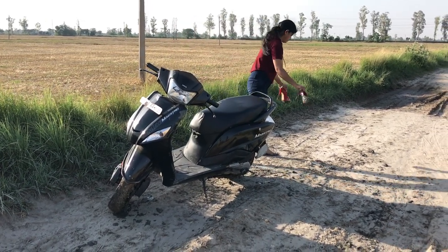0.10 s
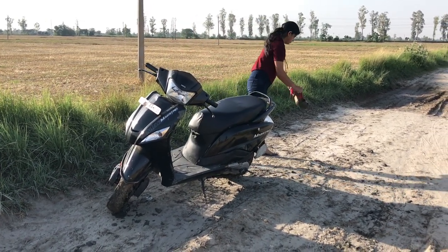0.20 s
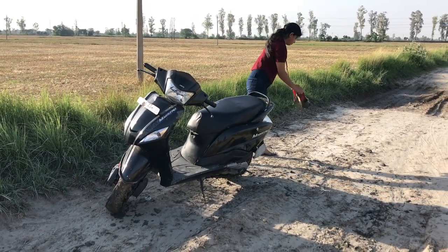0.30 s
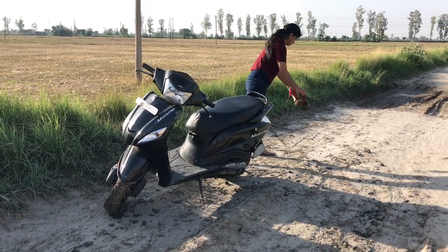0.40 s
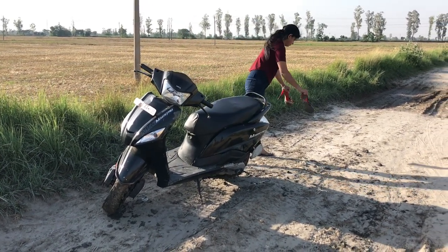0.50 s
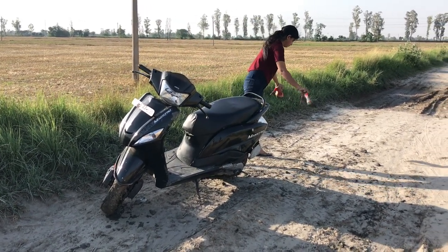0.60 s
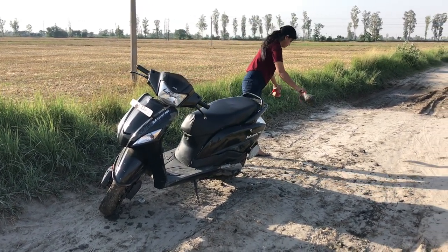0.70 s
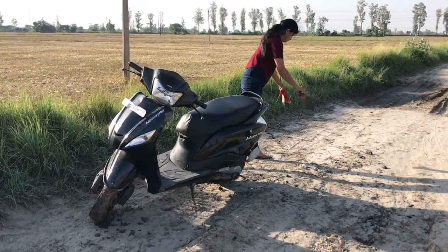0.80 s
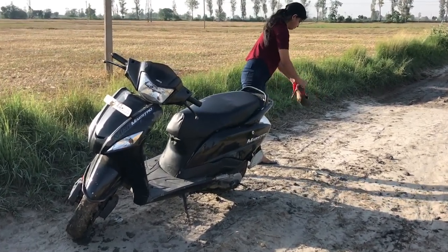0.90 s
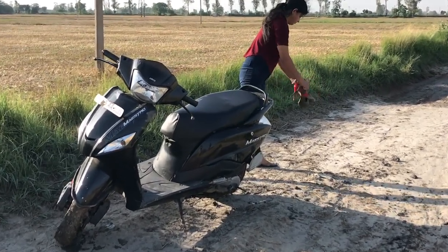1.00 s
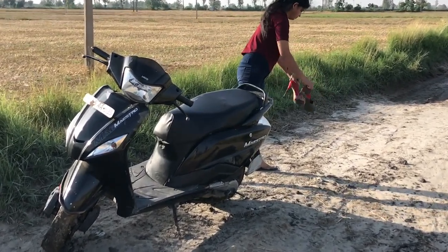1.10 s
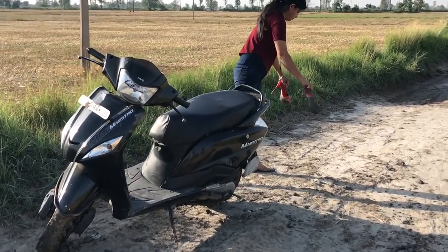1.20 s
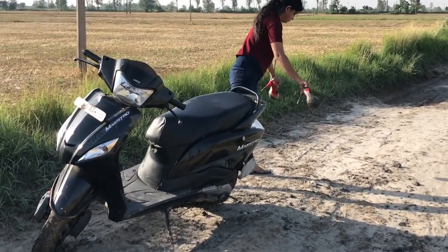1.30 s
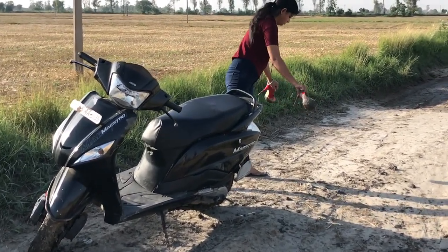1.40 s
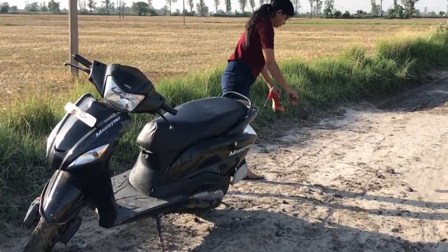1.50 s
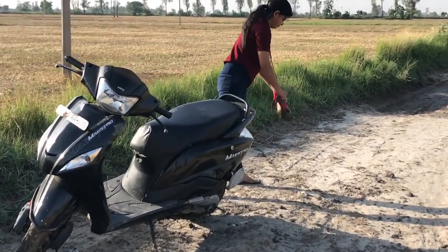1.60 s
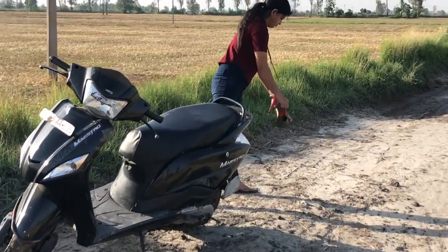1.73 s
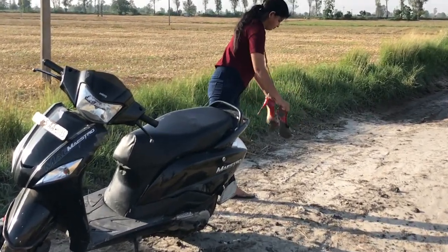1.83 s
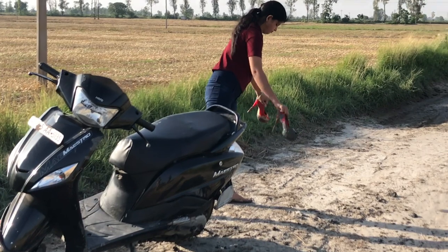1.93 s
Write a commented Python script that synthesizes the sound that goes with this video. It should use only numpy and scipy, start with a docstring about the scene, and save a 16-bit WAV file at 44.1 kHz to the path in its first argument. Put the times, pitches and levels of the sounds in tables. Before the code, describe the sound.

Sharp claps of mud-caked sandals, sole against sole, in an open field with low rumble and faint insects.

```python
"""Soft bumps on the microphone over a low rumble, then three claps of two muddy sandals in an open field.
Each clap, sole to sole, squeezes out a pop of air, rings the rubber and cracks the dried mud.
The soles rebound, and crumbs and dust tick down; the ground answers with a faint tail and a dull echo.
A faint high trill of falling chirps comes from the grass, with a thin unbroken insect further off.
Pops, rings and thuds are sines under envelopes; mud, dust, rumble and air are coloured noise."""
import sys
import numpy as np
from scipy import signal
from scipy.fft import rfft, irfft
from scipy.io import wavfile

SR = 44100
rng = np.random.default_rng(int(sys.argv[2]) if len(sys.argv) > 2 else 0)


def int16_out(signal):
    """Quantize to a 16-bit WAV file."""
    q = np.round(np.clip(np.atleast_2d(signal).T, -1, 1) * 32767)
    wavfile.write(sys.argv[1], SR, q.astype(np.int16))


N = 85995
T = np.arange(N) / SR   # s

# Colours of noise are relative: every noise is brought to rms 1 before its level is set.
# Deep rumble under the field. Each row: frequency in Hz, level in dB per Hz.
RUMBLE_COLOUR = [(15, -24), (30, -8.5), (50, 8.5), (72, 3), (110, 1.5), (140, -3.5), (220, -43.5)]
# Low drone above the rumble. Each row: frequency in Hz, level in dB per Hz.
DRONE_COLOUR = [(70, -10), (115, -2.5), (160, 0.5), (235, -2), (270, -9.5), (330, -9.5), (450, -22.5),
                (900, -40.5)]
# How rumble and drone rise and sink. Each row: time in seconds, rumble in dB, drone in dB.
LOW_LEVELS = [(0, -33, -42.5), (.08, -41, -44), (.2, -34.5, -41.5), (.4, -38, -44.5), (.56, -36.5, -45),
              (.74, -36.5, -43.5), (.98, -39, -40.5), (1.1, -39.5, -42), (1.3, -40.5, -45.5),
              (1.43, -39.5, -40.5), (1.55, -40, -43), (1.72, -37.5, -43.5), (1.95, -44, -41)]
LOW_SWAY_DB = 0.9   # random spread shared by rumble and drone
# Hush of open country. Each row: frequency in Hz, level in dB per Hz.
AIR_COLOUR = [(100, -31.5), (450, 2.5), (700, 5), (1150, 4), (1600, 0), (2300, -8), (4000, -14),
              (6000, -20), (8500, -16.5), (10300, -27.5), (12500, -8), (15000, -17.5), (16500, -11)]
# Level of that hush. Each row: time in seconds, level in dB.
AIR_LEVELS = [(0, -48.5), (.3, -50.5), (.5, -48), (.8, -50), (1.1, -49.5), (1.4, -48.5), (1.95, -49)]

# Trill in the grass. Each row: time in seconds, mid-chirp pitch in Hz, level in dB.
TRILL_CURVE = [(0, 8200, -54.5), (.26, 8200, -56), (.32, 8100, -78), (0.579, 7720, -80), (.68, 7800, -63),
               (.9, 7830, -54), (1.049, 7720, -54), (1.24, 7700, -56.5), (1.28, 7900, -82)]
# Pace of the trill. Each row: time in seconds, chirps per second, fall within a chirp in Hz.
CHIRP_PACE = [(0, 53, 1150), (.9, 53, 1400), (1.05, 88, 1900), (1.25, 92, 1900)]
# The insect further off. Each row: time in seconds, pitch in Hz, level in dB.
FAR_INSECT_CURVE = [(0, 8350, -79), (1.199, 8400, -65), (1.6, 8650, -71), (1.95, 8650, -61)]
CHIRP_WAVER_HZ, FAR_WAVER_HZ, FAR_FLUTTER_DB = 60, 176, 5   # random spreads

# Dull bumps on the microphone.
# Each row: start in seconds, level in dB, start pitch in Hz, end pitch in Hz, swell in seconds.
MIC_BUMPS = [(0.148, -29.5, 145, 88, 0.0095), (0.2406, -9.5, 231.5, 130, 0.0071),
             (0.2395, -22, 428, 270, 0.0029), (0.256, -11, 94, 60.6, 0.0054), (0.286, -21, 69, 56.5, 0.013),
             (0.351, -16.5, 80, 45, 0.0078), (0.423, -29, 61, 45, 0.012), (0.515, -32, 296, 89.4, 0.0074),
             (0.809, -21, 152, 45, 0.0037), (0.818, -24.5, 69, 49.7, 0.0074),
             (0.9075, -22.5, 125, 35, 0.0065)]
# Rubbing within a bump. Each row: frequency in Hz, level in dB per Hz.
SCUFF_COLOUR = [(60, 9), (200, 0.5), (450, -11.5), (700, -16), (1200, -51)]
BUMP_SHAPE, BUMP_GLIDE_S, BUMP_SCUFF_DB = 1.52, 0.017, -17   # scuff level is relative to the thud

# Dust sifting down through the grass after the contacts whose air pop exceeds DUST_FROM_DB.
DUST_FROM_DB, DUST_DELAY_S, DUST_FALL_S = -10, 0.042, 0.082   # the fall is thickest DUST_FALL_S after the delay
DUST_PER_S = 47   # ticks per second at the thickest of one fall
DUST_DB, DUST_T60_S = -51, 0.0031   # level of the faintest tick, decay of each

# Crumbs of mud landing. Each row: start in seconds, level in dB, fine part relative to the coarse in dB.
CRUMB_LANDINGS = [(0.316, -57, 21), (0.4046, -54, 5), (0.5762, -44.5, -8), (0.6013, -61, 13),
                  (0.6552, -46, 8), (0.9960, -47, 11.5), (1.0010, -51.5, 14.5), (1.008, -46, 0),
                  (1.0237, -56.5, 15), (1.556, -66.5, 17.5), (1.7052, -51.5, 21), (1.7115, -55.5, 18)]
# Fine part of a crumb, also used for dust. Each row: frequency in Hz, level in dB per Hz.
FINE_CRUMB_COLOUR = [(1000, -3.5), (4000, -30.5), (7000, -5.5), (10000, -7.5), (12500, -0.5),
                     (16000, -10.5)]
CRUMB_HOLD_S, CRUMB_T60_S = 0.00064, 0.018   # grainy body
CRUMB_SNAP_DB, CRUMB_SNAP_T60_S = 4.5, 0.0018   # first touch, relative to the body

# Sole contacts, claps and rebounds. Each row: start in seconds, air pop in dB, pop pitch in Hz,
# pop swell in seconds, sole ring in dB, hardness in dB per octave, highest ringing in Hz,
# mud crack in dB, gritty crunch in dB, clack in dB, clack pitch in Hz.
SOLE_CONTACTS = [(0.2797, 2, 1001, 0.0012, -27.5, 4.5, 3540, -18.5, -33, -22, 3016),
                 (0.2824, -4.5, 980, 0.00129, -34, -6, 3370, -37.5, -44, -11, 686),
                 (0.3023, -17, 1160, 0.0019, -32.5, -0.5, 3400, -50, -22, -20.5, 2693),
                 (0.3276, -30, 1230, 0.0019, -33, -1, 2980, -32.5, -47, -28.5, 2700),
                 (0.9588, -6, 1019, 0.0027, -11.5, -1, 5300, -15.5, -19.5, -16.5, 4175),
                 (1.6637, 0, 970, 0.0022, -13.5, -3, 3310, -17.5, -17, -16.5, 1400),
                 (1.6814, -16.5, 1050, 0.0022, -27, -3.5, 3600, -25.5, -25, -38, 2840)]
# Ringing modes of the rubber sole. Each row: frequency in Hz, level in dB, 60 dB decay in seconds.
SOLE_MODES = [(372, -8, 0.043), (694, -9, 0.034), (1375, 16, 0.0048), (1570, -14, 0.05), (1822, 6, 0.02),
              (2645, -5.5, 0.015), (2920, 2.5, 0.015), (4020, 4, 0.011), (4610, -20, 0.0053)]
# Breaking mud, fine. Each row: frequency in Hz, level in dB per Hz.
CRACK_COLOUR = [(300, -54), (1000, 25.5), (3000, -4), (5000, 1.5), (8500, 2.5), (10300, -2), (12300, 3),
                (14500, -4), (16500, -6)]
# Breaking mud, coarse. Each row: frequency in Hz, level in dB per Hz.
CRUNCH_COLOUR = [(500, -7), (1500, -9.5), (2300, 0), (2800, -7), (3500, 1), (4300, -2.5), (5000, -16),
                 (8000, -32), (16000, -42)]
POP_SHAPE, POP_SAG = 4.9, 0.069   # sag: fall in log pitch per swell time
CONTACT_S = 0.00056   # time constant of the closing soles
BODY_HZ, BODY_DB, BODY_T60_S = 165, -20, 0.12   # the whole sandal flexes; level relative to the sole ring
CLACK_SWELL_S = 0.0012
CRACK_HOLD_S, CRACK_T60_S, CRACK_GRAIN_DB = 0.0023, 0.012, 1.5
CRACK_SNAP_DB, CRACK_SNAP_T60_S = -1.5, 0.029   # relative to the crack
CRUNCH_HOLD_S, CRUNCH_T60_S = 0.0019, 0.014

# Scatter from grass and rough ground. Each row: frequency in Hz, level in dB per Hz.
SCATTER_COLOUR = [(200, -5), (500, 5), (1200, 5.5), (2200, -4), (3200, -3), (5000, -12), (10000, -15),
                  (13000, -12), (16000, -6)]
SCATTER_DB, SCATTER_T60_S = -18, 0.089
ECHO_DB, ECHO_S, ECHO_T60_S = -27.5, 0.049, 0.07   # level, delay and decay
CUTOFF_HZ = 15900   # top of the microphone channel


def from_db(db):
    """Decibels to gain."""
    return 10 ** (np.asarray(db) / 20)


def in_time(rows):
    """The columns of a curve, joined by straight lines."""
    s, *columns = np.transpose(rows)
    return [np.interp(T, s, column) for column in columns]


def noise(colour):
    """Noise of rms 1 with the given colour."""
    hz, db = np.transpose(colour)
    f = np.maximum(np.fft.rfftfreq(N, 1 / SR), 1)
    gain = from_db(np.interp(np.log(f), np.log(hz), db))
    x = irfft(rfft(rng.standard_normal(N)) * gain, N)
    return x / x.std()


def drift(rate):
    """Random wander of spread about 1, with `rate` new points per second."""
    return np.interp(T * rate, np.arange(4000), rng.standard_normal(4000))


def burst(start, hold, t60):
    """Envelope: sudden onset, short hold, exponential decay."""
    return (T >= start) * from_db(-60 * np.maximum(T - start - hold, 0) / t60)


def swell(age, peak_s, shape):
    """Envelope that rises to 1 at peak_s and dies away; a higher shape makes it narrower."""
    u = age / peak_s
    return (u * np.exp(1 - u)) ** shape


def sine(hz, age):
    """Sine on a pitch curve, starting when age turns positive."""
    return np.sin(2 * np.pi * np.cumsum(hz * (age > 0)) / SR)


def background():
    """Deep rumble, a low drone and the hush of open country, all coloured noise that rises and sinks."""
    rumble_db, drone_db = in_time(LOW_LEVELS)
    air_db, = in_time(AIR_LEVELS)
    low = from_db(rumble_db) * noise(RUMBLE_COLOUR) + from_db(drone_db) * noise(DRONE_COLOUR)
    sway = from_db(LOW_SWAY_DB * drift(15))
    return sway * low + from_db(air_db) * noise(AIR_COLOUR)


def far_insect():
    """A thin unbroken tone further off, wavering in pitch and fluttering in level."""
    hz, db = in_time(FAR_INSECT_CURVE)
    level = from_db(db + FAR_FLUTTER_DB * drift(100))
    return level * sine(hz + FAR_WAVER_HZ * drift(1300), T)


def grass_trill():
    """Quick chirps, each a swelling sine that falls in pitch, speeding up into a buzz."""
    hz, db = in_time(TRILL_CURVE)
    rate, fall_hz = in_time(CHIRP_PACE)
    cycle = (np.cumsum(rate) / SR + 0.054 * drift(17)) % 1   # place within a chirp, slightly uneven
    pitch = hz - fall_hz * (cycle - 0.5) + CHIRP_WAVER_HZ * drift(1000)
    return from_db(db) * np.sin(np.pi * cycle) ** 2 * sine(pitch, T)


def bumps():
    """Soft low thuds at the microphone with a little scuff, falling in pitch as they die."""
    out = np.zeros(N)
    scuff = from_db(BUMP_SCUFF_DB) * noise(SCUFF_COLOUR)
    for s, db, start_hz, end_hz, swell_s in MIC_BUMPS:
        age = np.maximum(T - s, 0)
        pitch = end_hz + (start_hz - end_hz) * np.exp(-age / BUMP_GLIDE_S)
        out += from_db(db) * swell(age, swell_s, BUMP_SHAPE) * (scuff - sine(pitch, age))
    return out


def field(near):
    """Grass and rough ground scatter the near sounds into a faint diffuse tail and one dull echo."""
    def tail(delay_s, t60):
        """Level of the spread-out energy, delayed and decaying."""
        spread = burst(delay_s, 0, t60) ** 2
        energy = signal.fftconvolve(near ** 2, spread / spread.sum())[:N]
        return np.sqrt(np.maximum(energy, 0))
    scatter = from_db(SCATTER_DB) * tail(0.001, SCATTER_T60_S) * noise(SCATTER_COLOUR)
    echo = from_db(ECHO_DB) * tail(ECHO_S, ECHO_T60_S) * noise(AIR_COLOUR)
    return scatter + echo


def dust():
    """Tiny random ticks of grit, each a decaying speck of noise, follow the hard claps."""
    falling = np.zeros(N)
    for s, pop_db, *_ in SOLE_CONTACTS:
        if pop_db > DUST_FROM_DB:
            falling += swell(np.maximum(T - s - DUST_DELAY_S, 0), DUST_FALL_S, 0.71)
    landings = (rng.random(N) < DUST_PER_S * falling / SR) * rng.uniform(1, 2.3, N)
    decay_per_sample = from_db(-60 / (DUST_T60_S * SR))
    envelope = signal.lfilter([1], [1, -decay_per_sample], landings + 1e-18)   # tiny offset avoids denormals
    return from_db(DUST_DB) * noise(FINE_CRUMB_COLOUR) * envelope


def crumbs(grain_db=3):
    """Loosened bits of mud land with a snap and a grainy patter of coarse and fine noise."""
    coarse, fine = noise(CRUNCH_COLOUR), noise(FINE_CRUMB_COLOUR)
    grain = from_db(grain_db * drift(1000))
    out = np.zeros(N)
    for s, db, fine_db in CRUMB_LANDINGS:
        body = grain * burst(s, CRUMB_HOLD_S, CRUMB_T60_S)
        snap = from_db(CRUMB_SNAP_DB) * burst(s, 0, CRUMB_SNAP_T60_S)
        out += from_db(db) * (coarse + from_db(fine_db) * fine) * (body + snap)
    return out


def air_pop(age, db, hz, swell_s):
    """Air squeezed from between the soles: a short swelling sine that sags in pitch."""
    early = np.minimum(age, 0.1)
    pitch = hz * np.exp(-POP_SAG * (early / swell_s - 1))
    return from_db(db) * swell(early, swell_s, POP_SHAPE) * sine(pitch, age)


def sole_ring(age, ring_db, hardness_db, pivot_hz):
    """Rubber modes set off as the soles close; hardness tilts their levels about pivot_hz."""
    early = np.minimum(age, 0.1)
    closing = 1 - np.exp(-age / CONTACT_S)
    out = np.zeros(N)
    for k, (hz, db, t60) in enumerate(SOLE_MODES):
        mode_db = ring_db + db + hardness_db * np.log2(hz / pivot_hz)
        out += (-1) ** k * from_db(mode_db - 60 * early / t60) * closing * sine(hz, age)
    return out


def body_flex(age, ring_db):
    """The whole sandal flexes as one low decaying mode."""
    return from_db(ring_db + BODY_DB - 60 * age / BODY_T60_S) * sine(BODY_HZ, age)


def clack(age, db, hz):
    """The struck patch of caked mud gives one short swelling tone."""
    return from_db(db) * swell(np.minimum(age, 0.1), CLACK_SWELL_S, 0.75) * sine(hz, age)


def sandals():
    """Each contact pops the air, rings and flexes the soles, and clacks, crunches and cracks the mud."""
    out, crunch = np.zeros(N), noise(CRUNCH_COLOUR)
    crack = noise(CRACK_COLOUR) * from_db(CRACK_GRAIN_DB * drift(2000))
    for (s, pop_db, pop_hz, swell_s, ring_db, hardness_db, top_hz,
         crack_db, crunch_db, clack_db, clack_hz) in SOLE_CONTACTS:
        age = np.maximum(T - s, 0)
        out += air_pop(age, pop_db, pop_hz, swell_s)
        sole = sole_ring(age, ring_db, hardness_db, pop_hz)
        sole += from_db(crunch_db) * crunch * burst(s, CRUNCH_HOLD_S, CRUNCH_T60_S)
        dull = signal.butter(6, top_hz, fs=SR, output="sos")
        out += signal.sosfilt(dull, sole + 1e-18)
        out += body_flex(age, ring_db)
        out += clack(age, clack_db, clack_hz)
        snap = from_db(CRACK_SNAP_DB) * burst(s, 0, CRACK_SNAP_T60_S)
        out += from_db(crack_db) * crack * (burst(s, CRACK_HOLD_S, CRACK_T60_S) + snap)
    return out


def scene():
    """All sources at one microphone; sandals and crumbs also stir the field."""
    near = sandals() + crumbs()
    insects = grass_trill() + far_insect()
    return (background() + insects + bumps() + field(near) + dust() + near)[None]


def record(dry):
    """The loudest peaks are rounded off below 1.1 and the top is cut."""
    rounded = dry / (1 + (dry / 1.1) ** 6) ** (1 / 6)
    top_cut = signal.ellip(10, 0.2, 80, CUTOFF_HZ, fs=SR, output="sos")
    return signal.sosfilt(top_cut, rounded)


dry = scene()
out = record(dry)
int16_out(out)
```